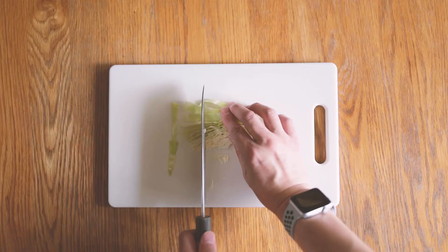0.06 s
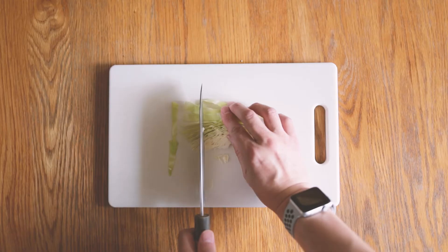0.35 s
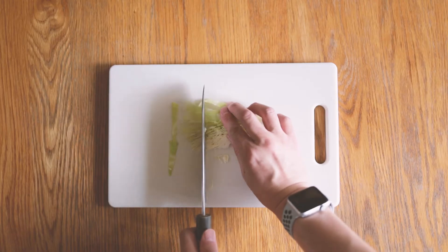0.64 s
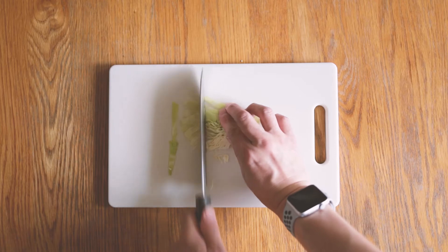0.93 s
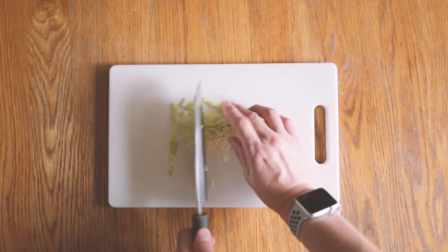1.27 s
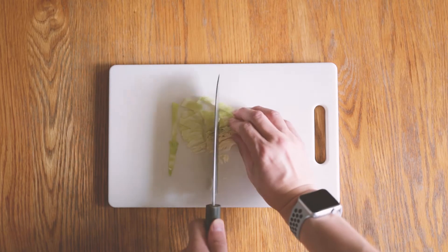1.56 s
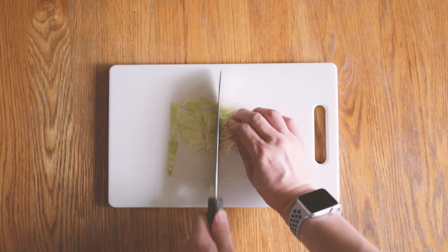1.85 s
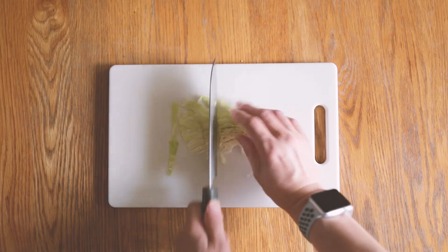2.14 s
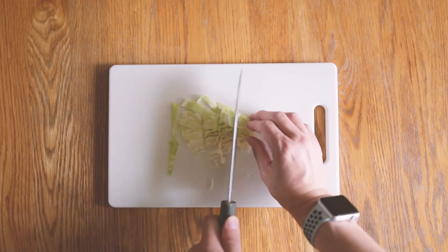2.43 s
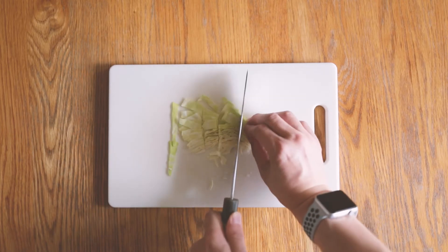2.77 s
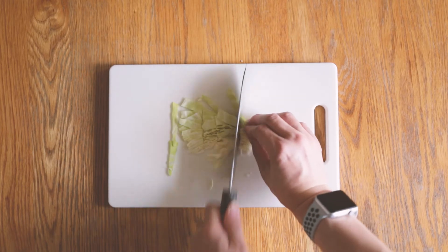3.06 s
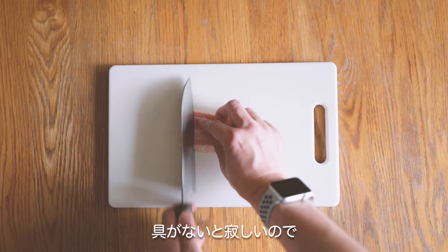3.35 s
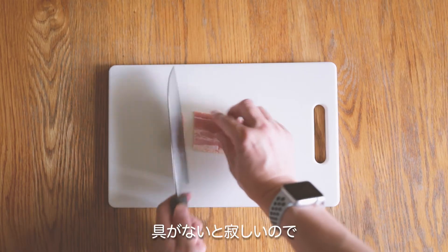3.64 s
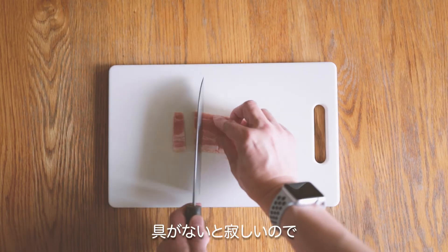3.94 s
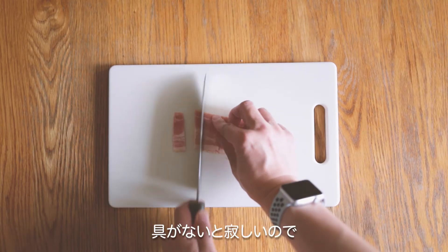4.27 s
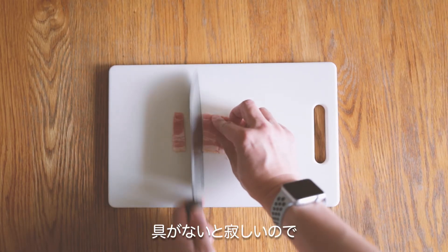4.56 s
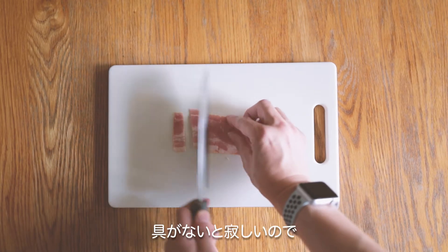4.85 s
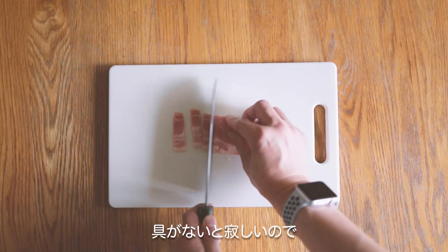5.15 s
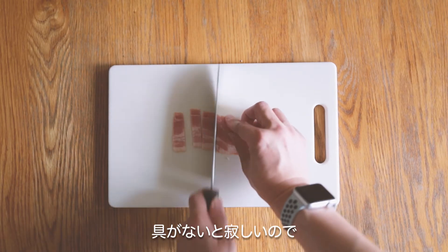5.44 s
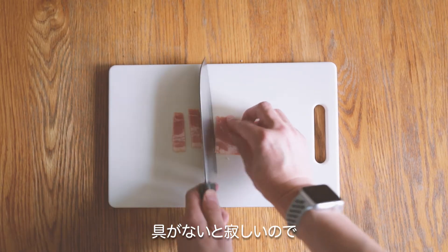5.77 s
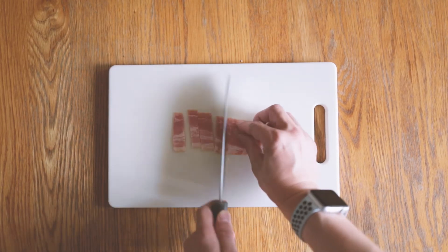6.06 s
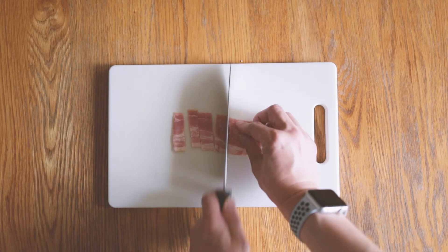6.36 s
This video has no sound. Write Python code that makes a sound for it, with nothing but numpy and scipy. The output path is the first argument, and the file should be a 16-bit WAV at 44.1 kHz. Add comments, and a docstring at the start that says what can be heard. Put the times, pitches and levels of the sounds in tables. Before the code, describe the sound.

After a very brief crinkle of a plastic packet, a kitchen knife makes three slow cuts through a crisp vegetable, each a crunch ending in a knock on a plastic board. Then the knife saws through strips of pork, its edge rasping to and fro on the board with short squeaks and a few dull knocks. The sound is close, in a small kitchen with faint background noise.

```python
"""A kitchen knife cuts and knocks on a plastic board lying on a wooden table, heard from close above.
Three cuts fracture a crisp vegetable, and the impacts of the edge excite the modes of the board.
Then the knife saws through strips of pork: friction rasps on the plastic, and stick-slip motion gives
short squeaks. A packet crinkles at the start; a small room adds reverberation, noise and a low rumble."""
import sys
import numpy as np
from scipy import signal
from scipy.fft import rfft, irfft
from scipy.io import wavfile
from scipy.ndimage import uniform_filter1d

SR = 44100
rng = np.random.default_rng(int(sys.argv[2]) if len(sys.argv) > 2 else 0)


def transcribe(u):
    """Save the signal u as a 16-bit wav file named by the first command-line argument.

    u: samples, shape (n,) or (channels, n), limited to [-1, 1]; the rate is SR.
    q: integer samples, one column per channel.
    """
    v = np.clip(np.atleast_2d(u).T, -1, 1)
    q = np.round(v * 32767).astype(np.int16)
    wavfile.write(sys.argv[1], SR, q)


N = 282310
TIME = np.arange(N) / SR

# Strokes of the edge to and fro along the board. Each row: middle and length in seconds,
# then relative levels in dB of heavy drag, light drag, rasp and hiss of the tip.
STROKES = [(1.006, .18, -53, -46, -56.5, -63), (1.197, .19, -49, -52.5, -56.5, -65.5),
           (1.989, .19, -41.5, -41, -50.5, -63), (2.141, .1, -61, -57.5, -74, -69),
           (3.137, .12, -42, -44, -51.5, -59.5), (3.24, .16, -38.5, -38, -55, -69.5),
           (3.413, .15, -39.5, -41.5, -56, -69), (3.542, .135, -33, -35.5, -46, -63.5),
           (4.339, 0.063, -37, -56, -55, -64.5), (4.392, .13, -35, -31, -44, -67),
           (4.531, 0.13, -31.5, -26, -37, -60.5), (4.657, 0.15, -27.5, -30, -36, -56),
           (4.746, .08, -58, -47, -52, -79), (5.41, .07, -36.5, -63, -61.5, -67),
           (5.489, 0.16, -35, -35.5, -42, -62), (5.645, .135, -31, -30, -39.5, -62),
           (5.711, 0.074, -36, -39, -70, -78), (5.788, .17, -28, -30.5, -38.5, -55.5),
           (6.336, 0.074, -61, -63, -52, -56.5), (6.41, .14, -35, -35.5, -43, -57)]


def amp(db):
    """Amplitude ratio of a level in decibels."""
    return 10 ** (np.asarray(db) / 20)


def unit(x):
    """Normalisation to an rms of one."""
    return x / np.sqrt(np.mean(x ** 2) + 1e-20)


def at_frequency(points, hz):
    """Interpolation of (frequency, value) points on a logarithmic frequency axis."""
    known_hz, values = np.transpose(points)
    return np.interp(np.log(hz + 1), np.log(known_hz + 1), values)


def convolve(x, response):
    """Output of a linear system with the given impulse response."""
    return signal.fftconvolve(np.atleast_2d(x), np.atleast_2d(response), axes=1)[:, :N]


def colour(x, spectrum, resonances=(), size=4096):
    """Minimum-phase filtering at unit energy, from (Hz, dB) points and resonance peaks."""
    hz = np.fft.rfftfreq(size, 1 / SR)
    peaks_db = sum(db / (1 + (2 * (hz - centre) / width) ** 2) for centre, width, db in resonances)
    cepstrum = irfft(np.log(amp(at_frequency(spectrum, hz) + peaks_db)))
    causal = (np.arange(size) > 0) & (np.arange(size) < size // 2)
    response = irfft(np.exp(rfft(2 * cepstrum * causal)))
    return convolve(x, response / np.linalg.norm(response))


def spread(x, apart):
    """Decorrelation: the treble reaches two microphones by differing short paths."""
    t = np.arange(SR // 120) / SR
    paths = rng.standard_normal(len(t)) * np.sin(np.pi * np.sqrt(t / t[-1]))
    side = convolve(x, paths / np.linalg.norm(paths))
    side = signal.lfilter(*signal.butter(2, 1100, 'high', fs=SR), side)
    return x + apart * side * np.array([[1], [-1]])


def grains(per_s, range_db):
    """Shot noise: impulses of uneven size at random times."""
    sizes = amp(range_db * np.minimum(rng.exponential(1, N), 4)) * rng.choice([-1, 1], N)
    return unit(sizes * (rng.random(N) < per_s / SR))


def wander(count, size):
    """Random fluctuation: noise averaged over size samples."""
    return unit(uniform_filter1d(rng.standard_normal(count), size))


def steady(x, size=900):
    """Division by the running rms removes slow swells and keeps the grain."""
    return x / np.sqrt(uniform_filter1d((x ** 2).mean(0), size) + 1e-9)


def room(x, gap_s=0.007):
    """Reverberation: a diffuse field decays exponentially, nearly alike at both microphones in the bass."""
    # Decay of the kitchen. Each row: frequency in Hz, reverberation time in seconds.
    decay_times = [(100, 0.44), (400, 0.33), (1000, 0.48), (3000, 0.25), (8000, 0.17), (16000, 0.2)]
    hz, t, bands = signal.stft(rng.standard_normal((2, SR // 2)), SR, nperseg=256)
    mid, side = bands * amp(-60 * t / at_frequency(decay_times, hz)[:, None])
    side *= at_frequency([(200, 0.21), (600, 0.25), (1500, 0.3), (4000, 1.0)], hz)[:, None]
    tail = signal.istft(np.array([mid + side, mid - side]), SR, nperseg=256)[1]
    tail /= np.linalg.norm(tail[0])
    return convolve(x, np.pad(tail, ((0, 0), (int(gap_s * SR), 0))))


def background():
    """Ambient noise: a nearly steady broadband bed, and a low rumble that swells towards the end."""
    # Spectrum of the room noise. Each row: frequency in Hz, relative level in dB.
    air_spectrum = [(15, -51), (25, -22), (55, 0.5), (92, -11.5), (134, -2), (277, -2.5), (335, -1.5),
                    (405, -4.5), (714, -9), (775, -10.5), (1610, -13.5), (3920, -26.5), (13200, -41.5),
                    (16000, -44.5)]
    # Course of the room noise. Each row: time in seconds, relative level in dB.
    air_levels = [(0, -61.5), (2.6, -59.5), (3.9, -58), (6.4, -58.5)]
    # Course of the rumble. Each row: time in seconds, level in dB.
    rumble_levels = [(0, -87), (2.4, -76), (3.7, -69.5), (5.0, -71), (6.05, -60.5), (6.25, -61.5),
                     (6.4, -47.5)]
    rumble_spectrum = [(15, -21), (35, -3.5), (55, 0.5), (90, 1.5), (160, -2), (500, -60)]
    air = unit(colour(rng.standard_normal(N), air_spectrum))
    air *= amp(1 + np.interp(TIME, *np.transpose(air_levels)))
    rumble = unit(colour(rng.standard_normal(N), rumble_spectrum))
    rumble *= amp(np.interp(TIME, *np.transpose(rumble_levels)))
    diffuse = amp(-6) * room(air)
    return spread(air, apart=0.94) + diffuse + rumble


def packet(level_db=-42.5, t60_s=0.1):
    """Decaying shot noise: a packet of thin plastic crinkles and settles."""
    # Spectrum of the crinkle. Each row: frequency in Hz, relative level in dB.
    spectrum = [(400, -6.5), (800, -12.5), (1400, -1), (2000, -1), (4100, -12), (7200, -18), (15000, -35)]
    crinkle = steady(colour(grains(per_s=2800, range_db=0.5), spectrum))
    return spread(crinkle * amp(level_db - 60 * TIME / t60_s), apart=0.54)


def wipes():
    """Band-limited friction noise: food rubs the flat of the blade, which sings faintly."""
    # Each row: middle and half length in seconds, level in dB, centre and bandwidth in Hz.
    rubs = [(1.22, 0.081, -63, 2340, 700), (1.684, 0.0096, -52.5, 2520, 1990),
            (3.663, 0.016, -55, 1500, 900), (3.717, 0.094, -61.5, 2050, 700),
            (3.725, 0.066, -63, 4220, 1000), (4.785, 0.046, -49.5, 2240, 350),
            (4.768, 0.12, -61, 3670, 1300), (4.888, 0.092, -59.5, 2210, 513)]
    out = np.zeros((1, N))
    for middle_s, half_s, db, hz, width_hz in rubs:
        band = signal.butter(2, [hz - width_hz / 2, hz + width_hz / 2], 'band', fs=SR, output='sos')
        envelope = amp(db) * np.exp(-((TIME - middle_s) / half_s) ** 2)
        out += envelope * unit(signal.sosfilt(band, rng.standard_normal(N)))
    return spread(out, apart=0.3)


def squeaks(waver=0.023, overtone_db=-24):
    """Stick-slip oscillation: the edge catches and slides in step with a strong mode of the board."""
    # Each row: middle and half length in seconds, level in dB, frequency in Hz.
    catches = [(3.447, 0.018, -31, 548), (4.424, 0.023, -27, 552), (4.700, 0.018, -30, 540),
               (5.509, 0.024, -23, 540), (5.612, 0.022, -23.5, 541)]
    out = np.zeros(N)
    for middle_s, half_s, db, hz in catches:
        near = abs(TIME - middle_s) < 4 * half_s
        t = TIME[near] - middle_s
        phase = 2 * np.pi * np.cumsum(hz * (1 + waver * wander(len(t), size=200))) / SR
        tone = np.sin(phase) + amp(overtone_db) * np.sin(2 * phase)
        out[near] += amp(db) * np.exp(-(t / half_s) ** 2) * tone
    return out


def tearing_envelope(break_rise_db=10, draw_fade_db=-23, tear_rise_s=0.0035):
    """Progressive fracture: crackle grows as the stalk gives way and fades as the blade is drawn out."""
    # Cuts through the vegetable. Each row: arrival at the board in seconds, then a duration in
    # seconds and a relative level in dB for each of pressing, breaking and drawing out.
    cuts = [(0.836, .13, -56.5, 0.022, -36, 0.29, -55), (1.845, 0.11, -51, 0.011, -38.5, 0.3, -51),
            (2.865, .15, -58.5, 0.046, -34, 0.25, -61)]
    # Single leaves tear. Each row: time in seconds, relative level in dB, 60 dB decay time in seconds.
    tears = [(0.602, -54, 0.14), (0.713, -50, .13), (1.13, -61.5, 0.4), (1.583, -59, 0.28),
             (1.676, -51.5, 0.29), (1.763, -35, 0.073), (2.545, -51, 0.2), (2.715, -47.5, .09),
             (3.055, -59.5, 0.5)]
    gain = np.zeros(N)
    for arrival_s, press_s, press_db, break_s, break_db, draw_s, draw_db in cuts:
        t = TIME - arrival_s
        gain += amp(press_db) * ((t > -press_s) & (t <= -break_s))
        gain += amp(np.interp(t, [-break_s, 0], [break_db - break_rise_db, break_db], -np.inf, -np.inf))
        gain += amp(draw_db + draw_fade_db * (t / draw_s) ** 2) * (t > 0)
    for peak_s, db, t60_s in tears:
        t = TIME - peak_s
        rise = np.exp(np.minimum(t, 0) / tear_rise_s)
        gain = np.hypot(gain, rise * amp(db - 60 * np.maximum(t, 0) / t60_s))  # powers add
    return abs(uniform_filter1d(gain, size=130))


def snaps(tear_s=0.0009):
    """Brittle fracture: fibres snap and wet food ticks in noise bursts of a few milliseconds."""
    # Each row: time in seconds, relative level in dB, weight of the lower treble in dB.
    fractures = [(0.1157, -58, -10), (0.1467, -56, -13), (0.606, -47, -1), (0.6524, -51, -1),
                 (0.7141, -40, 12.5), (0.7248, -44, 8), (0.8194, -28, -3), (0.833, -32, 6.5),
                 (0.9896, -41, -6), (1.043, -43.5, -9), (1.068, -51, -3), (1.4955, -56, -8),
                 (1.5834, -37, -12), (1.5907, -40.5, -24), (1.7504, -37.5, 4.5), (1.766, -23, -14),
                 (1.7866, -34, -16), (1.8218, -41, -10), (1.8399, -29.5, -4), (1.881, -39.5, 4),
                 (1.8937, -36.5, -15), (1.9082, -41, -14), (1.9403, -47, -6), (1.9674, -39.5, -5),
                 (2.0123, -46, -2), (2.0537, -51, -9), (2.0726, -47, -8), (2.0956, -44.5, -24),
                 (2.1159, -48, -18), (2.5445, -42, -6), (2.5556, -41, 5), (2.7132, -39, -4),
                 (2.756, -49.5, 15.5), (2.7811, -44, 1), (2.822, -34.5, -1), (2.8514, -26, -5),
                 (3.057, -52, -14), (3.644, -56, -2), (5.1425, -58, -4), (5.8466, -60, -6)]
    high_spectrum = [(1500, -5), (4500, 5), (8000, 2.5), (12000, -1.5), (16000, -1)]
    low_spectrum = [(200, -13), (700, -24), (1300, -7), (1900, -2), (3300, 1), (5500, -21.5),
                    (12000, -38.5)]
    high, low = np.zeros((2, N))
    age = np.arange(SR // 50) / SR / tear_s
    for time_s, db, weight_db in fractures:
        burst = amp(db) * unit(rng.laplace(size=len(age)) * age ** 2 * np.exp(-age)) / 4
        start = round((time_s - tear_s / 2) * SR)
        high[start:start + len(age)] += burst
        low[start:start + len(age)] += amp(weight_db) * burst
    return amp(-5) * colour(high, high_spectrum) + amp(-6) * colour(low, low_spectrum)


def vegetable(ring, crackle_db=-3, board_db=-30, damping_s=0.029):
    """Acoustic emission: cell walls burst in a dense crackle, fibres in snaps; both drive the board."""
    # Spectrum of the crackle. Each row: frequency in Hz, relative level in dB.
    spectrum = [(200, -13), (700, 5.5), (1300, 4.5), (1900, 4.5), (3200, 4.5), (4500, 3.5), (8000, 1.5),
                (12000, -2.5), (16000, -5)]
    cells = grains(per_s=6000, range_db=3) + amp(-1) * grains(per_s=280, range_db=3)
    crackle = steady(colour(cells, spectrum), size=2000) * tearing_envelope()
    crunch = amp(crackle_db) * crackle + snaps()
    damped_ring = ring * np.exp(-TIME[:len(ring)] / damping_s)  # the food damps the board
    return spread(crunch, apart=0.44) + amp(board_db) * convolve(crunch, damped_ring)


def stroke_speed(middle_s, length_s):
    """Half a cycle of harmonic motion: the edge speeds up from rest and slows to rest again."""
    return np.sin(np.pi * np.clip((TIME - middle_s) / length_s + 0.5, 0, 1))


def friction_envelope(part, power, tilt_db):
    """Friction noise grows as a power of speed; its level also tilts by tilt_db along each stroke."""
    column = ["heavy", "light", "rasp", "hiss"].index(part)
    gain = np.zeros(N)
    for middle_s, length_s, *levels_db in STROKES:
        along = np.clip((TIME - middle_s) / length_s, -0.5, 0.5)
        gain += amp(levels_db[column] + tilt_db * along) * stroke_speed(middle_s, length_s) ** power
    return gain


def chatter(slow_hz=280, fast_hz=900, roughness=0.22):
    """Roughness excitation: the edge rides over the pebbled surface at a rate that rises with speed."""
    speed_squared = sum(stroke_speed(*row[:2]) ** 2 for row in STROKES)
    hz = (slow_hz + (fast_hz - slow_hz) * speed_squared) * (1 + roughness * wander(N, size=60))
    phase = 2 * np.pi * np.cumsum(hz) / SR
    return unit(np.sin(phase) + 0.5 * np.sin(2 * phase))


def blade_echo(x, near_s=0.001214, far_s=0.0026, reflection=0.43, slide_hz=1.3):
    """Reflection: bending waves return from the blade's end, their delay drifting as the contact slides."""
    place = 0.5 + 0.5 * np.sin(2 * np.pi * (slide_hz * TIME + rng.random()))
    delay_s = near_s + (far_s - near_s) * place
    first = reflection * np.interp(TIME - delay_s, TIME, x)
    second = reflection ** 2 * np.interp(TIME - 2 * delay_s, TIME, x)
    return x + first + second


def sawing(ring, chatter_db=-14, damping_s=0.049):
    """Sliding friction: the edge trips over scored plastic; the slips shake the board and the blade."""
    # Spectra of the two drag forces, the rasp and the hiss. Each row: frequency in Hz, relative level in dB.
    heavy_spectrum = [(60, -20), (150, -16), (300, -8), (480, -1), (560, 1), (620, -14.5), (720, -11.5),
                      (1500, -40)]
    light_spectrum = [(300, -40), (540, -27), (640, 4), (800, -0.5), (1100, -5), (1400, -11), (2200, -23.5),
                      (5000, -51.5)]
    rasp_spectrum = [(300, -54.5), (1000, -5.5), (1350, -9), (1650, 7.5), (2300, -2), (3100, -0.5),
                     (3600, -3), (4100, -12), (5500, -16.5), (8000, -46.5), (15000, -41)]
    hiss_spectrum = [(2500, -30), (4000, -4.5), (5000, 10.5), (6500, 5), (8000, -2), (11000, -9),
                     (15000, -7)]
    # Resonances of the blade. Each row: frequency in Hz, bandwidth in Hz, boost in dB.
    blade_modes = [(1788, 99, 4), (2205, 31, 14), (2495, 71, 9.5), (2810, 130, 6.5), (3030, 260, 2)]
    slips = grains(per_s=2500, range_db=3)
    force = slips + amp(chatter_db) * chatter()
    damped_ring = ring * np.exp(-TIME[:len(ring)] / damping_s)  # meat and hand damp the board
    heavy = steady(convolve(colour(force, heavy_spectrum), damped_ring))
    light = steady(convolve(colour(force, light_spectrum), damped_ring))
    grit = unit(amp(-wander(N, size=130)))  # old knife marks make clumps of a few milliseconds
    rasp = steady(colour(blade_echo(slips * grit), rasp_spectrum, blade_modes))
    hiss = steady(colour(grit * rng.standard_normal(N), hiss_spectrum))
    # The edge bites first and bears down later: the drag tilts up, rasp and hiss tilt down.
    heavy *= amp(-2) * friction_envelope("heavy", power=1.17, tilt_db=3.5)
    light *= amp(-1) * friction_envelope("light", power=1.17, tilt_db=3.5)
    rasp *= amp(-0.5) * friction_envelope("rasp", power=2.3, tilt_db=-8.5)
    hiss *= amp(-3) * friction_envelope("hiss", power=1.6, tilt_db=-6)
    drag = spread(heavy + light, apart=0.61)
    lean_right = amp([[-1.1], [1.1]])
    return drag + lean_right * spread(rasp, apart=0.38) + spread(hiss, apart=0.87)


def board_ring(build_s=0.0034, dense_db=-5, dense_t60_s=0.12):
    """Modal superposition: low modes move at once, higher ones build up out of step among many weak ones."""
    # Modes of the board on its table. Each row: frequency in Hz, relative level in dB,
    # 60 dB decay time in seconds.
    modes = [(133.5, -28, 0.54), (169.9, -16, 0.41), (221.7, -18.5, 0.24), (243, -9.5, 0.11),
             (279.7, -9, 0.1), (305.4, -9, 0.1), (333, -12, 0.43), (356.9, -5, 0.25), (428, -18.5, 0.15),
             (480, -4.5, 0.22), (536.9, 0.5, 0.2), (565.3, -1.5, 0.065), (631, -14.5, 0.22),
             (640.3, -9.5, 0.063), (700, -10, 0.24), (752.4, 0.5, 0.12), (780.8, -2, 0.22), (819, -3, 0.13),
             (835, -15.5, 0.48), (907, -8, 0.12), (938, -14, 0.13), (1076, -9.5, 0.11), (1110, -10, 0.2),
             (1237, -25, 0.16), (1394, -13, 0.15), (1492, -12, 0.084), (1614, -17.5, 0.085),
             (1737, -11.5, 0.093)]
    dense_spectrum = [(150, -36), (400, -4.5), (900, 7.5), (1300, -10), (1800, 2.5), (2400, -15),
                      (4000, -30), (9000, -18)]
    t = np.arange(SR // 2) / SR
    dense = colour(rng.standard_normal(len(t)), dense_spectrum)[0, :len(t)]
    ring = unit(dense) * amp(dense_db - 60 * t / dense_t60_s)
    for hz, db, t60_s in modes:
        is_high = hz > 450
        build = 1 - is_high * np.exp(-t / build_s)
        phase = 1.57 + is_high * rng.normal(0, 0.68)
        ring += amp(db - 60 * t / t60_s) * build * np.sin(2 * np.pi * hz * t + phase)
    return ring


def knocks(ring, thud_db=-3, thud_s=0.00057):
    """Impact excitation: each blow of the edge pushes the board in and sets it ringing."""
    # Each row: start in seconds, relative force in dB, lower cutoff in Hz (high for a touch of the
    # tip), upper cutoff in Hz (low when food cushions the blow).
    impacts = [(0.714, -48, 614, 2500), (0.8362, -18.5, 175, 1400), (1.7530, -41.5, 138.4, 800),
               (1.7660, -54, 396, 1300), (1.8460, -22, 135, 450), (2.5550, -57, 400.5, 1100),
               (2.8240, -42, 450, 1300), (2.8638, -18.5, 174, 1560), (3.644, -38.5, 880, 1990),
               (5.3775, -21, 145, 384), (6.147, -32, 67.2, 129.3), (6.328, -30.5, 128.7, 339.7)]
    age = np.arange(len(ring)) / SR / thud_s
    blow = ring + amp(thud_db) * np.e * age * (2 - age) * np.exp(-age)
    out = np.zeros(N)
    for start_s, db, low_hz, high_hz in impacts:
        # A small board radiates little bass: the air slips around it.
        radiated = signal.sosfilt(signal.butter(4, low_hz, 'high', fs=SR, output='sos'), blow)
        cushioned = signal.lfilter(*signal.butter(4, high_hz, fs=SR), radiated)
        span = out[round(start_s * SR):][:len(ring)]
        span += amp(db) * cushioned[:len(span)]
    return spread(out[None], apart=0.43)


def scene(board_wet_db=-9, blade_wet_db=-10, crunch_wet_db=-7):
    """Superposition of the direct sound of knife, food and board, its reverberation and the background."""
    ring = board_ring()
    blows = knocks(ring)
    blade = sawing(ring) + squeaks() + wipes()
    crunch = vegetable(ring) + packet()
    wet = room(amp(board_wet_db) * blows + amp(blade_wet_db) * blade + amp(crunch_wet_db) * crunch)
    return blows + blade + crunch + wet + background()


def record(dry, cutoff_hz=15950):
    """Band limiting: a linear-phase low-pass filter removes the highest treble."""
    lowpass = signal.firwin(511, cutoff_hz, window=("kaiser", 9), fs=SR)
    return signal.oaconvolve(dry, lowpass[None], "same")


dry = scene()
out = record(dry)
transcribe(out)
```